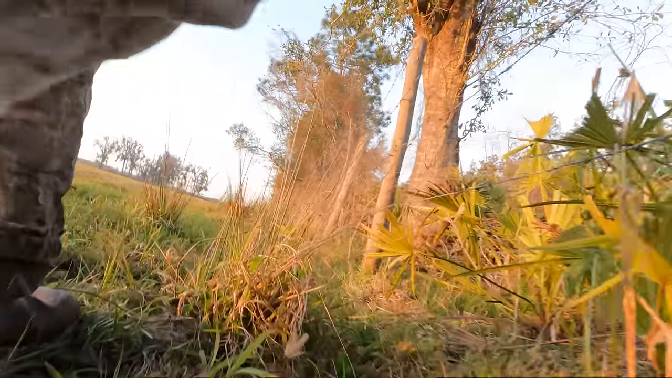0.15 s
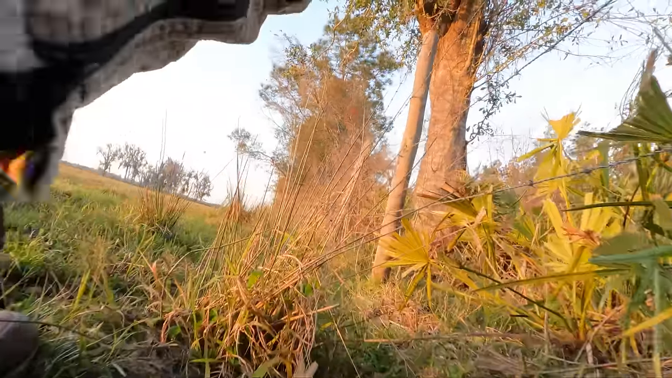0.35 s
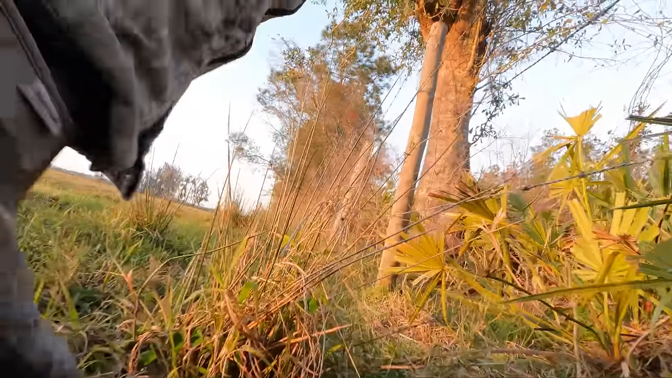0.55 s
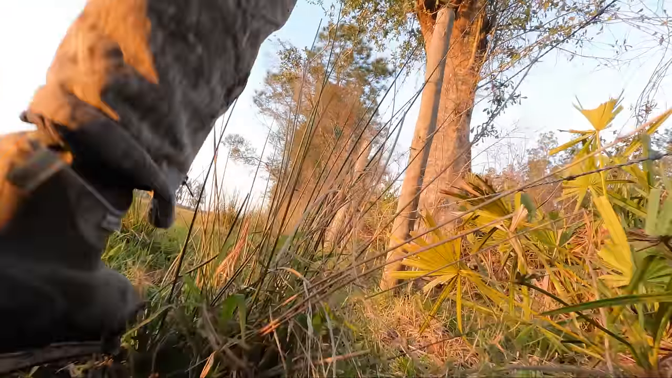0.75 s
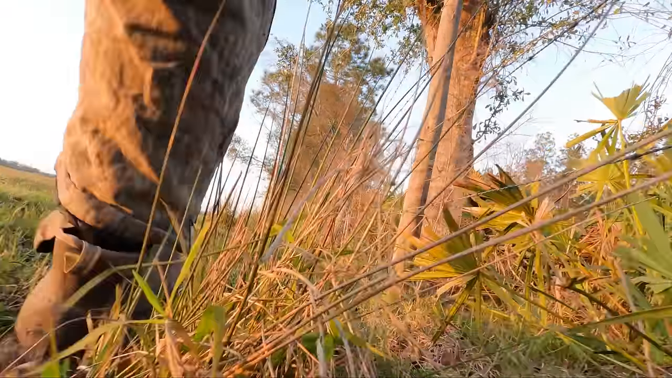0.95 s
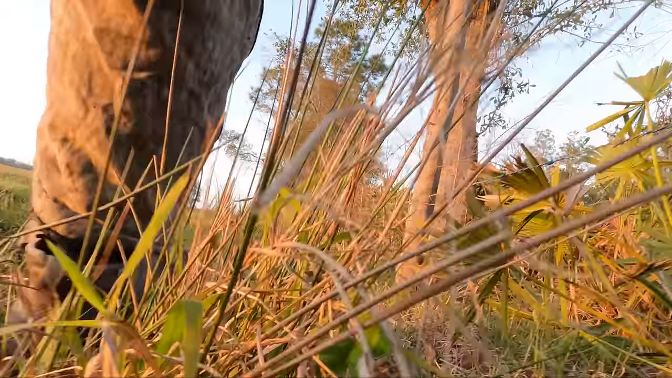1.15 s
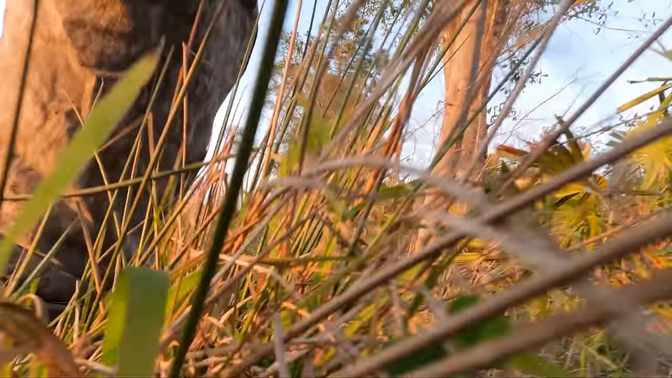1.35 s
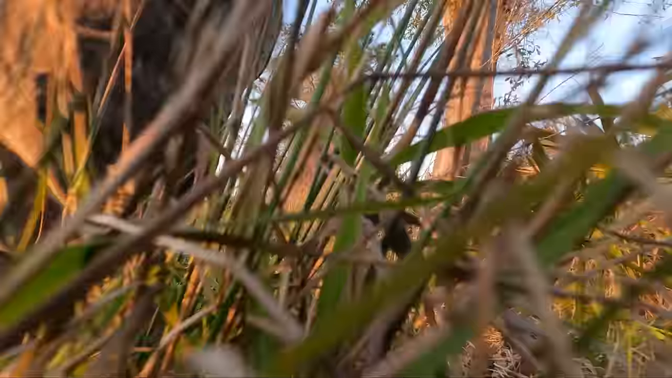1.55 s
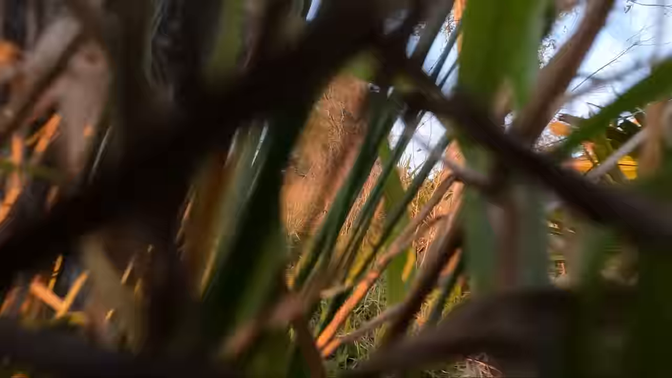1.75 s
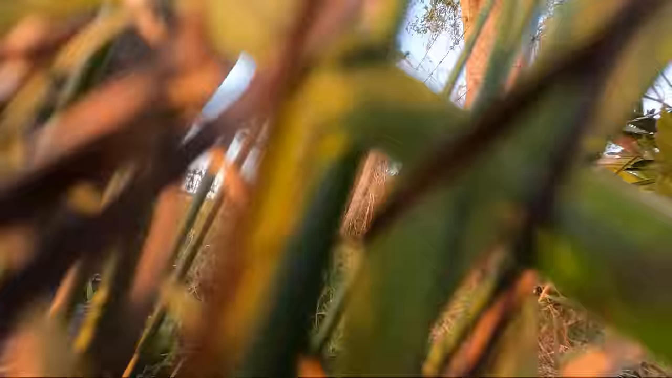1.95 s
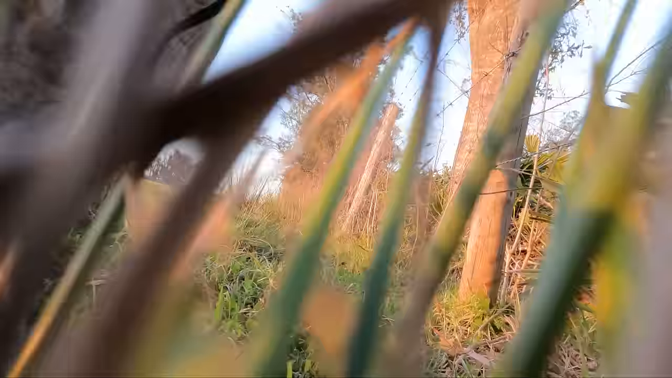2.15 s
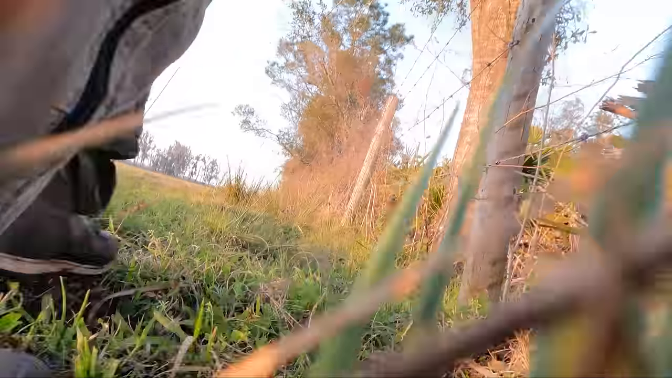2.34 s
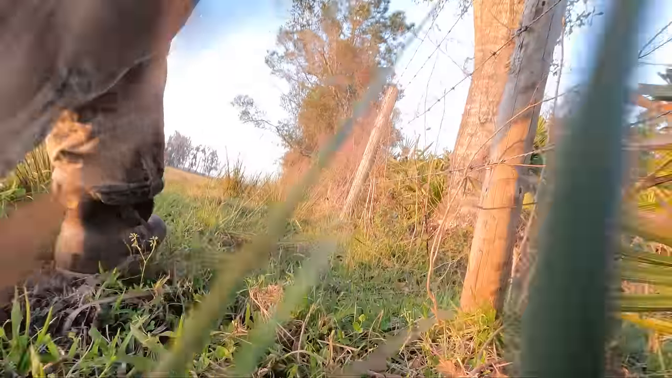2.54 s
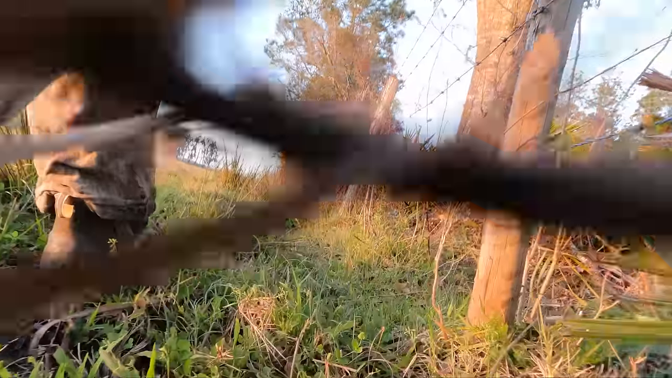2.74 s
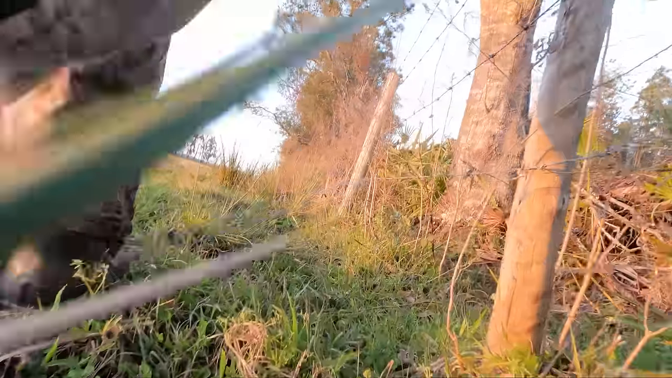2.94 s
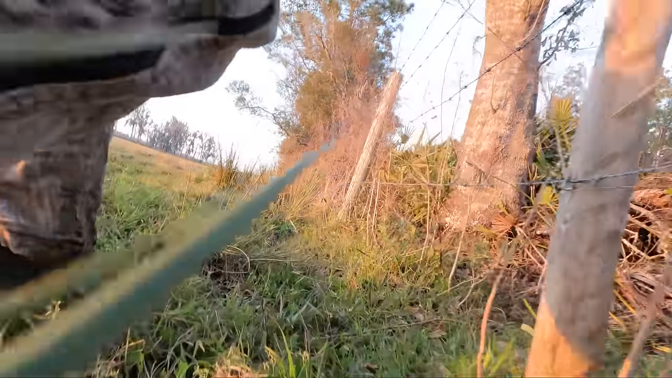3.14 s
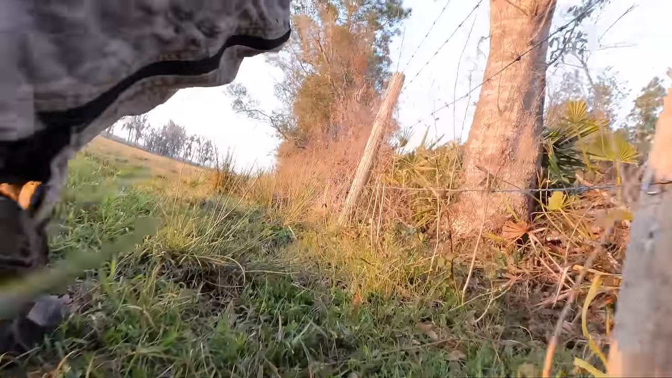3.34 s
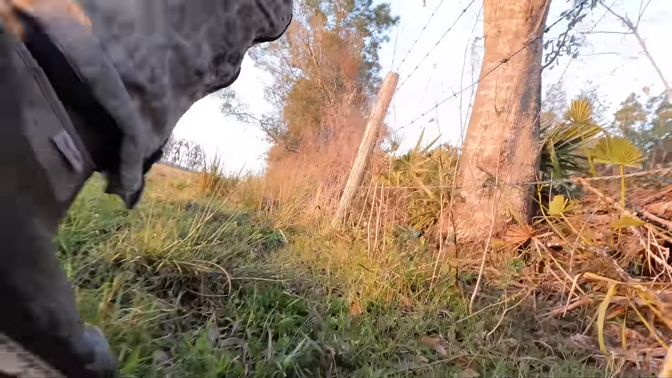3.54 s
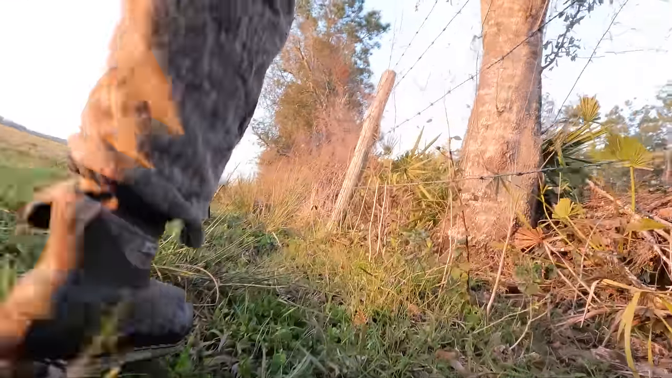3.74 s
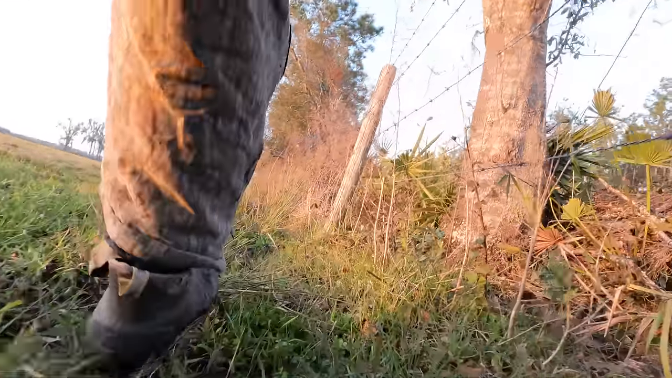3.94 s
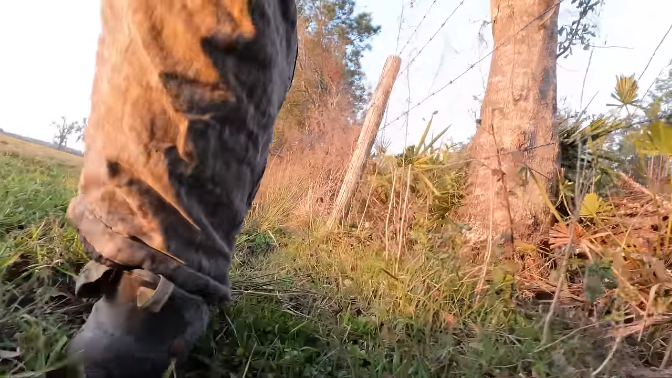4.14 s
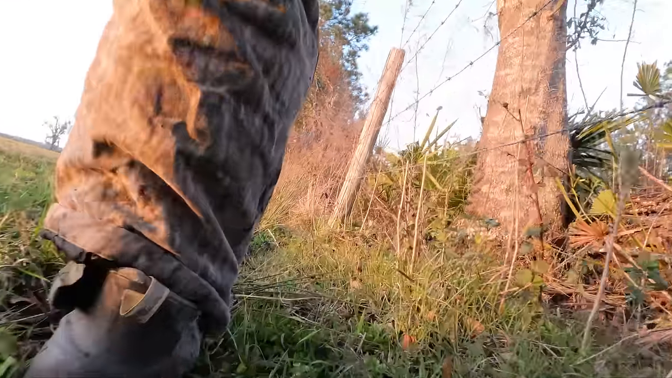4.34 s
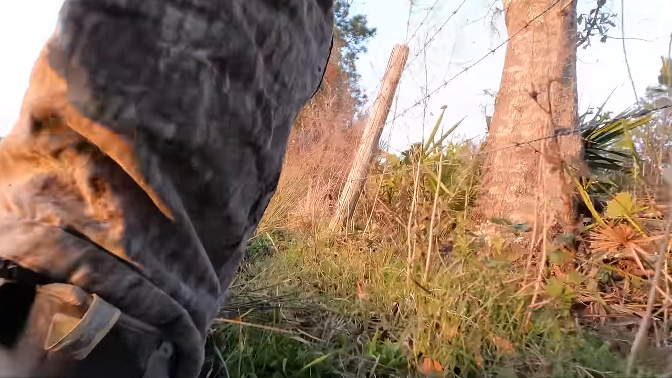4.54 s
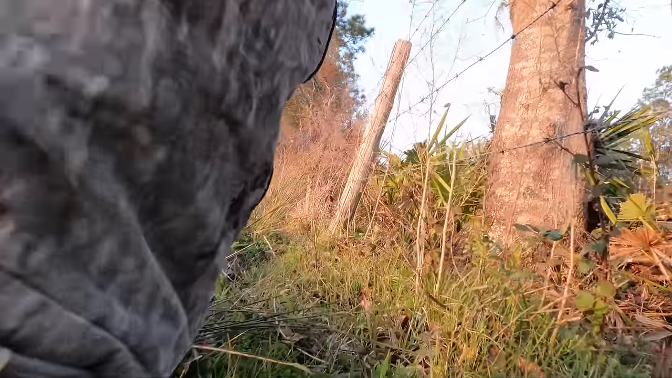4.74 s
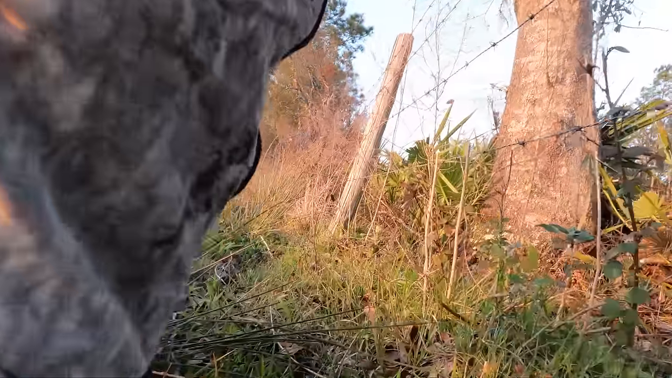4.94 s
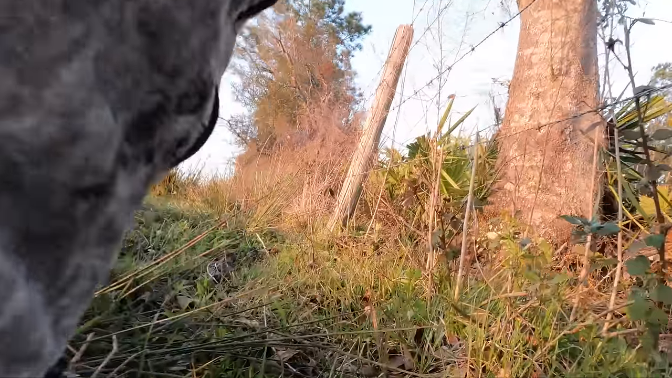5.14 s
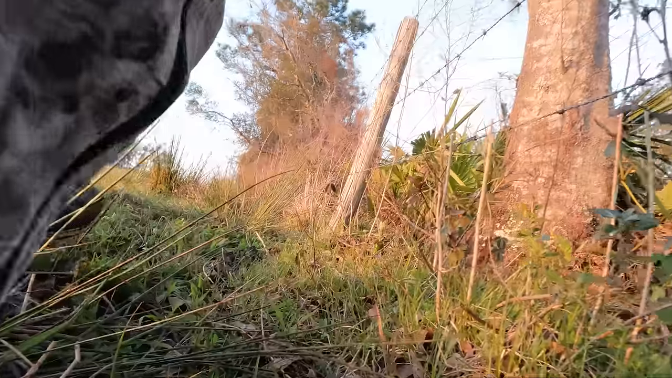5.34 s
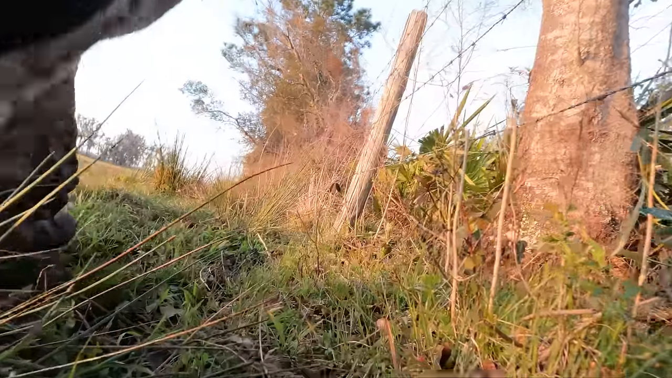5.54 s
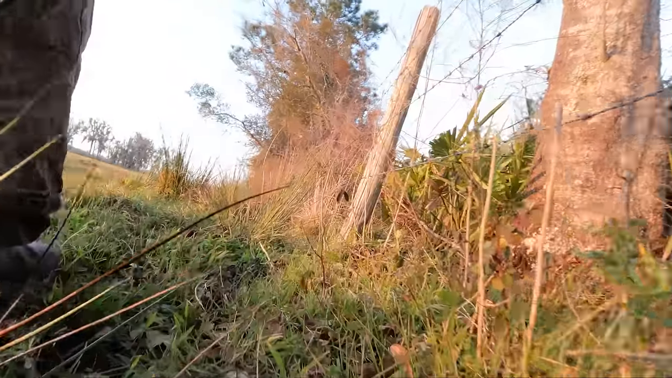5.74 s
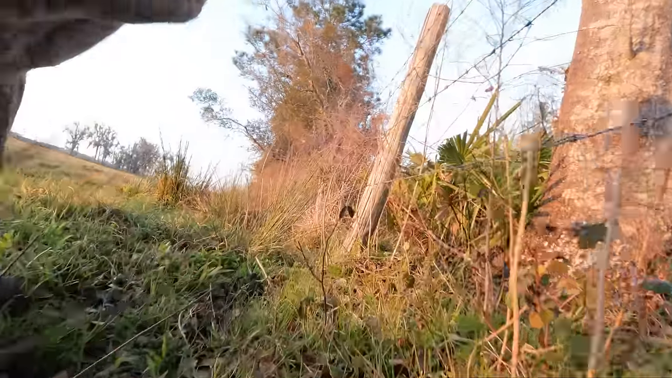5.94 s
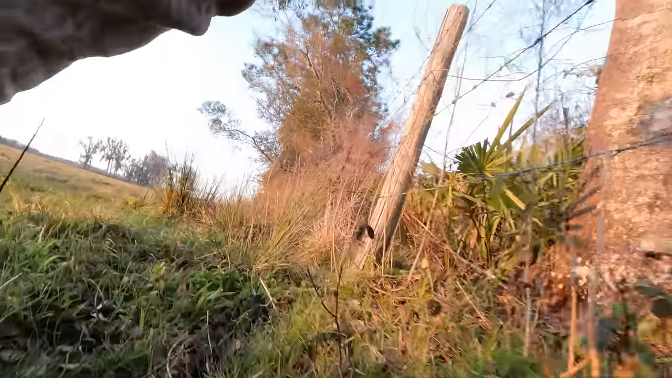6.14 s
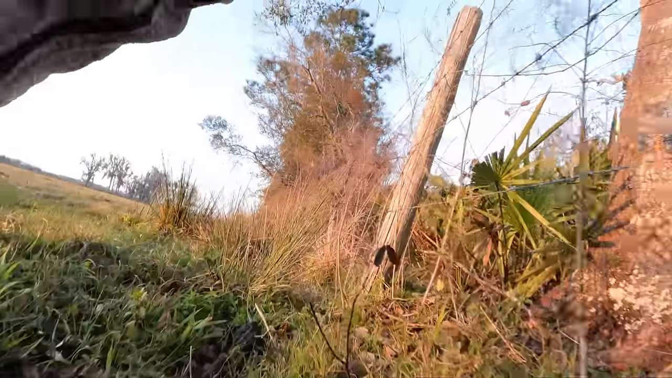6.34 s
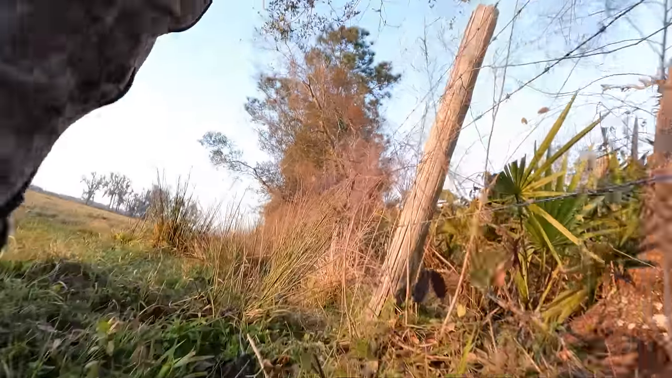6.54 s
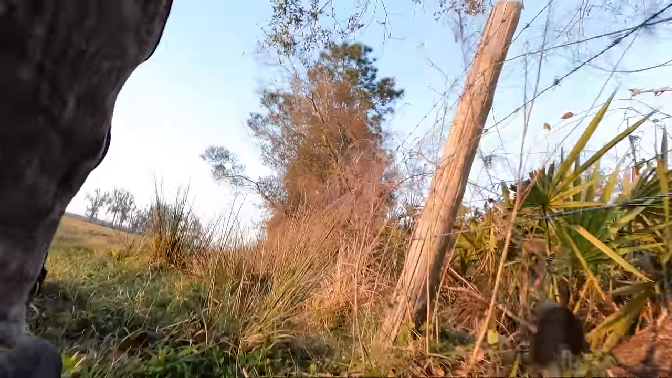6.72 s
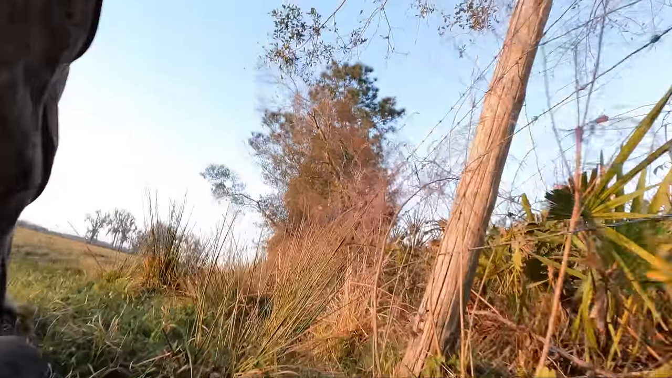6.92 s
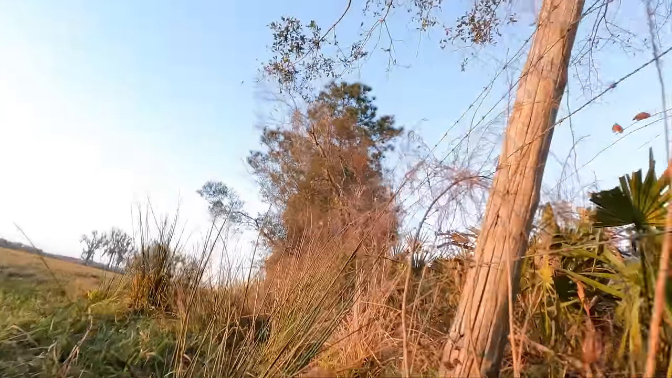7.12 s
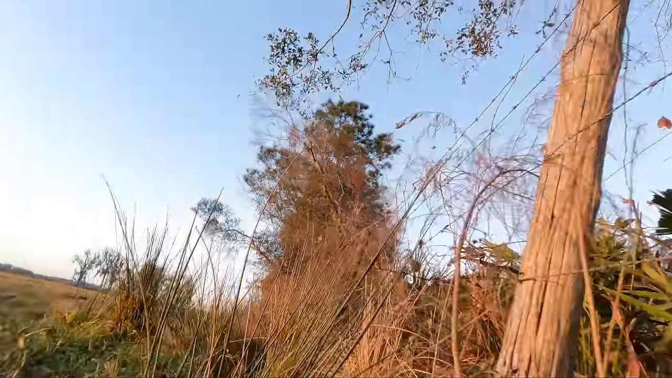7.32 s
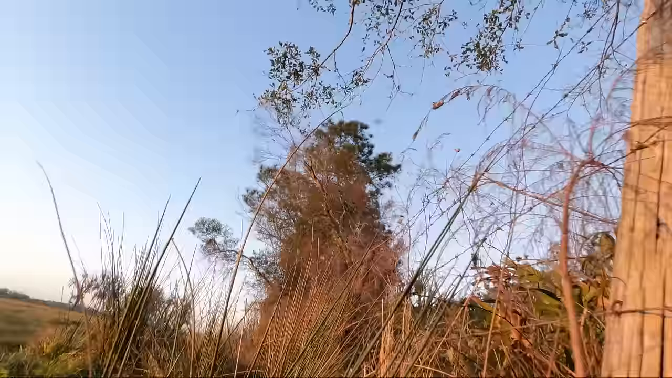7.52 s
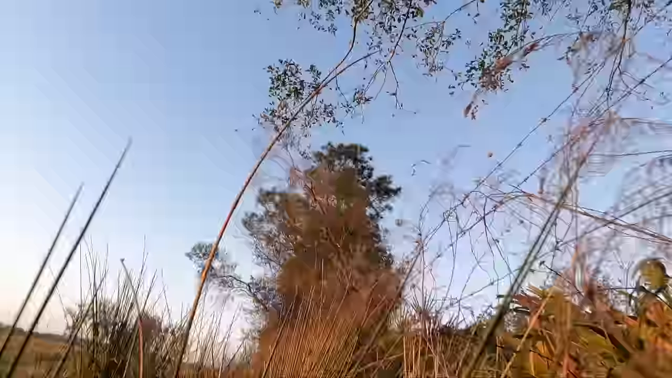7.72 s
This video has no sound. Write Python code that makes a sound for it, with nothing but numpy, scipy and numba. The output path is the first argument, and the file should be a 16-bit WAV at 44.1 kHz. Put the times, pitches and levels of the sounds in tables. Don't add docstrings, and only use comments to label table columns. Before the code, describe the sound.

Grass and dry stalks brush, scrape and knock right against a microphone as someone walks through pasture, loudest in a crackling burst early on.

```python
import sys
import numpy as np
from scipy import signal
from scipy.fft import rfft, irfft, dct
from scipy.io import wavfile
from scipy.ndimage import uniform_filter1d, map_coordinates
from numba import njit

SR = 44100
rng = np.random.default_rng(int(sys.argv[2]) if len(sys.argv) > 2 else 0)


def generate_wav(signal):
    frames = np.transpose(np.atleast_2d(signal))
    scaled = np.clip(frames, -1, 1) * 32767
    pcm = np.round(scaled).astype(np.int16)
    wavfile.write(sys.argv[1], SR, pcm)


def voltage_ratio(decibels):
    exponent = np.asarray(decibels, float) / 20
    return 10 ** exponent


N = 343053

BRUSH_DB = -33
ENGINE_HZ, ENGINE_DB, ENGINE_SECOND_DB = 37.55, -34.5, -20
SWEEP_RISE, JOLT_RISE = 0.94, 0.93
SWEEP_DB_PER_OCTAVE2 = -1.64
HEAVY_SHARE = 0.37
CRUNCH_T60_S, TICK_T60_S = 0.032, 0.012
FILTER_REACH = 0.59

SIZE_HZ = (130, 280, 1000, 3200, 6200)
# (frequency [Hz], level per Hz [dB])
PORT_COLOUR = [(65, -39), (110, -5.5), (150, -7.5), (450, -12), (1200, -12.5), (2600, -16), (3300, -17),
               (3950, -19), (4600, -23), (5400, -27.5), (6250, -29), (7000, -37), (7800, -50),
               (8700, -47.5)]
# (time [s], pressure [dB], tilt to fine parts [dB])
PRESSURE = [(0, -10.5, -1.5), (.45, -15, -5), (1.02, -13.5, 3.5), (1.3, -12, 5), (1.6, -9, -6.5),
            (1.78, 3, 2), (2.49, 2.5, 0), (3.03, 6, -2.5), (3.12, -9, 3), (3.55, -10.5, 1.5),
            (3.6, -13, -4), (4.4, -9.5, 0.5), (4.88, -15.5, -1.5), (5.59, -18, 0), (6.15, -8.5, -0.5),
            (6.7, -13, -4.5), (7.45, -11.5, -3.5), (7.65, -19, -5)]
# (time [s], peak [dB], time to fade 20 dB [s], pitch of the
# parts [Hz])
SWEEPS = [(.178, 0, 0.025, 1100), (.29, -4, -0.06, 3000), (.453, -5, 0.02, 500), (.84, -2.5, 0.25, 688),
          (1.1, -7.5, 1.1, 250), (1.128, 7.5, 0.0653, 3540), (1.46, 1, 0.2, 598), (1.67, 1.5, 0.2, 4020),
          (1.709, 12.5, -0.15, 1000), (1.762, 13.5, 0.0052, 1200), (2.086, 13.5, 0.17, 1500),
          (2.24, 10.5, 0.39, 2245), (2.92, 14.5, 0.16, 504), (3.01, 12, 0.14, 1510), (3.21, 5, 0.18, 1500),
          (3.429, 1.5, 0.26, 2510), (3.64, -5, 0.44, 302), (3.84, 1.5, 0.04, 900), (4.095, -9, -0.2, 700),
          (4.16, -3.5, 0.4, 298), (4.291, 3, 0.09, 605), (4.745, -4, 0.21, 2500), (5.22, -5.5, 0.5, 504),
          (5.94, -7.5, 0.9, 795), (6.317, 5, 0.1462, 1510), (6.74, -3.5, 0.1, 600),
          (6.979, -6.5, 0.27, 696), (7.065, 2, 0.09, 1206), (7.238, 3, 0.11, 1530),
          (7.48, -12.5, 0.22, 2980),
          (1.52, -1.5, 0.14, 1480), (2.6, 4.5, 0, 800), (2.789, 8, 0.12, 2480), (3.33, 4, 0.04, 1985),
          (3.76, -2, -0.1, 1505), (4.56, -4.5, 0.35, 714), (4.685, -1, 0.07, 2780), (1.455, 4, 0, 3500),
          (1.852, 12.5, 0.02, 2000), (4.08, -6.5, 0.3, 2800), (4.791, -6, 0.18, 2210),
          (2.06, 10.5, .03, 2000), (6.43, -2.5, 0.03, 3000), (6.5, -3, 0, 500), (7.52, -10.5, .1, 2500),
          (6.11, -12.5, 0.05, 3000), (6.34, 2.5, 0.18, 502), (6.96, -1.5, 0.03, 6000),
          (7.03, -7, 0.07, 6000), (7.31, -6.5, 0.13, 5000), (6.28, 0, 0, 3800), (6.94, 1, 0, 4530),
          (7.072, 2.5, 0.12, 5000)]
# (start [s], end [s], depth [dB], time to return [s])
LULLS = [
    (.1, .165, -4, .006),
    (0.458, 0.855, -15.5, 0.12),
    (1.172, 1.4, -4.5, 0.048),
    (0.889, 1.03, -3, .04),
    (3.895, 4.029, -4.5, .05),
    (4.6, 4.658, -4, .006),
    (6.805, 6.918, -15.5, .006),
]
# (frequency [Hz], width [Hz], level [dB])
FAR_RUSTLE = [
    (1660, 120, -57.5),
    (3900., 260, -75),
    (6190, 800, -82.5),
]
# (time [s], air on the port [dB], unsteadiness of the grip [dB])
CARRY = [(0, -39.5, -41.5), (.21, -37.5, -52.5), (.87, -37, -56), (.95, -42, -48), (1.1, -37.5, -51),
         (1.58, -32.5, -43.5), (1.7, -29.5, -40), (1.86, -18.5, -38.5), (2.47, -19.5, -31),
         (3.05, -19, -24), (3.38, -23.5, -46), (3.6, -28.5, -42), (4.18, -35, -49), (5.46, -42, -55),
         (6.2, -35, -54.5), (6.6, -39.5, -59), (7.02, -32, -51), (7.78, -35, -54.5)]
# (time [s], thump [dB], ring of the mount [dB], time to fade 20 dB [s])
JOLTS = [(0, -46.5, -28, 0), (.73, -42.5, -43, 0), (.87, -43.5, -47.5, 0.4), (1.1, -26.5, -31, -0.1),
         (1.648, -25, -25, 0.03), (1.86, -19, -14, 0.1454), (1.941, -18.5, -28, 0.18),
         (2.06, -17.5, -33, 0.15), (2.121, -24.5, -13, 0.156), (2.3, -31, -42.5, -0.4),
         (2.47, -21, -23, 0.29), (2.66, -31, -15.5, 0.07), (2.84, -34.5, -22.5, -0.05),
         (3.03, -20, -25.5, 0.26), (3.2, -22, -28.5, -0.03), (3.278, -47, -20.5, 0.17),
         (3.66, -36, -18.5, 0.05), (3.9, -47.5, -44, 1.2), (4.18, -22.5, -50, -0.1), (4.27, -44.5, -33, 0),
         (4.68, -46.5, -43.5, .5), (6.3, -38, -35, -0.03), (6.58, -44, -57.5, 2.5), (6.74, -27, -42, -0.13),
         (7.02, -27.5, -43, 0.1), (7.43, -43.5, -60, -0.4), (7.78, -40.5, -47, -1.2)]
# (time [s], pitch [Hz])
MOUNT_HZ = [(0, 88.4), (1.1, 94.6), (1.7, 88.6), (2.2, 86.78), (2.5, 80.44), (2.8, 85.58), (3.3, 84),
            (3.62, 79.2), (3.7, 90), (4.5, 84.2), (6.5, 100.5), (7.78, 98.6)]
# (time [s], depth [dB], half length [s])
DRONE_DIPS = [
    (0, -15, 0.15),
    (0.54, -7.5, 0.47),
    (0.724, -16, 0.12),
    (2.3, -16, 1.38),
    (3.69, -17.5, 0.084),
    (4.3, -4, 0.17),
    (5.6, -2.5, 0.62),
    (6.034, -12, 0.12),
    (6.895, -11, 0.074),
    (7.78, -2, 0.58),
]
# (time [s], peak [dB], ring [Hz])
TICKS = [(0.0493, -43, 2970), (0.2872, -33, 3730), (0.3844, -41, 2910), (0.5821, -41, 4300),
         (1.4547, -32, 2960), (1.485, -26, 3360), (1.5194, -21.5, 3510), (1.6044, -35.5, 2550),
         (1.639, -15.5, 3700), (1.7053, -21.5, 3410), (1.749, -28, 2700), (1.8036, -23.5, 3230),
         (1.8514, -13, 2920), (1.9144, -25, 3420), (2.0414, -15, 3020), (2.0867, -14.5, 2630),
         (2.3094, -20, 3400), (2.3894, -22, 3400), (2.598, -28, 2870), (2.6544, -23, 3600),
         (2.9944, -17.5, 3420), (3.0944, -20, 3510), (3.145, -22.5, 3750), (3.2094, -32, 2500),
         (3.418, -26, 3090), (3.4394, -32.5, 2630), (3.5374, -31, 3430), (4.082, -33, 2990),
         (4.6598, -31, 2640), (4.6894, -37.5, 2900), (4.7358, -28.5, 2630), (4.7744, -36, 2670),
         (5.6385, -20, 2580), (5.9384, -34, 2720), (5.9524, -24, 2880), (6.0516, -42, 2720),
         (6.1838, -28, 5080), (6.2307, -28, 3580), (6.2756, -21, 3510), (6.3344, -32, 3600),
         (6.3694, -36, 2660), (6.4268, -34, 2820), (6.557, -36, 2570), (6.96, -23, 4560),
         (6.977, -36, 4070), (7.022, -33, 3000), (7.0788, -31, 2500), (7.1244, -29.5, 2700),
         (7.2757, -31, 2770), (7.2944, -37, 2590), (7.3994, -43, 2510), (7.422, -31, 3650),
         (7.5794, -39, 3150)]
# (time [s], peak [dB], ring [Hz], time to fade 60 dB [s])
SCRAPES = [
    (0.1634, -27, 1620, 0.087),
    (0.4434, -31, 1400, 0.047),
    (1.7629, -23, 1453, 0.069),
    (2.9986, -20, 1204, 0.06),
    (6.9494, -31, 1965, 0.066),
    (7.0623, -27, 1716, 0.052),
]
# (time [s], peak [dB], ring [Hz], time to fade 60 dB [s])
KNOCKS = [(.164, -22.5, 1024, 0.07), (.443, -25, 1430, 0.057), (1.709, -14.5, 903, 0.05),
          (1.76, -12.5, 798, 0.038), (1.847, -18.5, 946, 0.048), (2.597, -16.5, 527, 0.039),
          (3.0, -11, 680, 0.038), (3.162, -10.5, 1082, 0.034), (3.414, -25, 1623, 0.057),
          (4.199, -25.5, 630, 0.054), (4.734, -26.5, 1793, 0.053), (5.936, -28.5, 523, 0.054),
          (7.122, -23.5, 797, 0.025), (7.514, -26, 635, 0.047)]
# (multiple of its pitch, level [dB])
STALK_PARTIALS = [
    (1.002, 5.5),
    (1.599, -7.5),
]
# (time [s], peak [dB], ring [Hz], time to fade 60 dB [s])
FLICKS = [(0.2882, -40, 6000, 0.007), (1.1268, -26, 6300, 0.014), (1.6212, -35.5, 5910, 0.013),
          (1.7619, -21, 6500, 0.011), (1.8033, -36.5, 5720, 0.012), (3.694, -25.5, 1310, 0.022),
          (3.62, -24, 1300, 0.023), (2.599, -20, 2500, .01), (4.299, -18, 746, 0.019),
          (5.06, -23.5, 1260, 0.023), (6.426, -25, 650, 0.015), (7.261, -20.5, 3770, 0.011),
          (7.276, -22.5, 2400, 0.011)]
# (time [s], peak [dB], ring [Hz], time to fade 60 dB [s])
TAPS = [(.443, -27, 600, .035), (.745, -30, 300, .02), (1.439, -25, 790, .025), (1.7625, -10, 1200, .008),
        (1.8845, -17, 2000, .005), (2.599, -18, 696, 0.0091), (3.001, -13, 900, 0.013),
        (3.4395, -14, 1250, 0.0085), (4.2015, -24, 600, .01), (4.3012, -17.5, 222, 0.022),
        (5.64, -31, 1500, 0.014), (5.841, -33, 794, .012), (6.021, -16, 800, .008),
        (6.275, -29, 1300, .012), (6.325, -25, 420, .04), (6.974, -21, 330, .03), (7.062, -24, 520, .015),
        (7.194, -25, 560, 0.022), (7.228, -23, 377, .02), (7.4645, -27.5, 696, 0.0089)]
# (time [s], peak [dB], ring [Hz], time to fade 60 dB [s])
STEPS = [(0.743, -33.5, 101, 0.062), (1.096, -20, 125, 0.06), (1.5, -34, 153, 0.096),
         (1.853, -17, 101.4, 0.13), (3.049, -29, 172.3, 0.074), (3.629, -27.5, 106, 0.067),
         (4.295, -32, 182, 0.087), (5.059, -40, 145, 0.08), (6.204, -41, 134, 0.08),
         (6.703, -34, 121.6, 0.08), (7.691, -39, 121, 0.12)]
# (time [s], peak [dB], ring [Hz])
CRUNCHES = [(1.38, -24, 708), (1.419, -31, 670), (1.482, -23.5, 687), (1.517, -26, 810), (1.595, -26, 656),
            (1.746, -17.5, 1270), (1.849, -14, 964), (2.056, -16.5, 890), (2.089, -20, 630),
            (2.102, -11.5, 1280), (2.384, -12.5, 1460), (2.579, -18, 1340), (2.713, -12.5, 634),
            (2.826, -22, 850), (2.907, -8, 868), (3.0, -12.5, 654), (3.093, -21, 1160),
            (3.145, -13.5, 1080), (3.207, -23, 985), (3.239, -23, 770), (3.418, -18, 1660),
            (3.525, -21.5, 1655), (3.84, -28, 1410), (4.052, -31, 724), (4.091, -27, 690),
            (4.332, -23.5, 765), (4.66, -29, 2120), (4.69, -25, 1540), (4.736, -22, 1766),
            (4.768, -33, 1364), (4.799, -28, 1840), (5.611, -34, 1630), (5.699, -32, 1470),
            (5.796, -25.5, 697), (5.937, -32, 1400), (6.048, -37, 600), (6.085, -22, 820),
            (6.161, -27, 1580), (6.275, -23, 1200), (6.301, -29, 1500), (6.329, -27, 651),
            (6.426, -31, 721), (6.626, -37, 1030), (6.679, -30, 791), (6.702, -27, 770), (6.932, -21, 840),
            (7.01, -34, 630), (7.078, -25, 1750), (7.142, -22, 1005), (7.517, -35, 724), (7.578, -27, 990)]
# (time [s], peak [dB], ring [Hz], time to fade 60 dB [s])
SNAPS = [(1.6608, -9.5, 3800, 0.016), (1.7047, -17.5, 3410, 0.019), (1.7484, -26, 2660, 0.007),
         (1.78, -24, 2550, 0.007), (1.8487, -21, 3270, 0.013), (1.8843, -17, 3300, 0.013),
         (2.0458, -20, 3160, 0.012), (2.0579, -21, 3560, 0.012), (2.6327, -17.5, 3250, 0.017),
         (2.9469, -22, 2610, 0.02), (2.985, -29, 2630, 0.013), (3.0008, -16, 2470, 0.011),
         (3.0182, -10, 3800, 0.013), (3.1453, -24.5, 3900, 0.015), (3.4064, -30, 3080, 0.016),
         (4.2014, -28, 2800, 0.023), (4.2815, -24, 2960, 0.028), (5.0603, -31, 3625, 0.019),
         (5.84, -30, 2430, 0.017), (7.1718, -33, 3880, 0.016), (7.1865, -20, 3940, 0.018),
         (7.2152, -19.5, 4010, 0.021), (7.249, -20.5, 3000, 0.014), (7.4644, -23.5, 3340, 0.0096)]
# (multiple of its pitch, level [dB])
STEM_PARTIALS = [
    (.45, 0.5),
    (0.999, 4),
    (1.6, -19),
]
# (time [s], peak [dB], ring [Hz], time to fade 60 dB [s])
THUDS = [(2.057, -7, 245, 0.031), (2.826, -13, 434, 0.039), (2.935, -9.5, 421, 0.059),
         (4.089, -16, 245, 0.025), (4.149, -25, 350, 0.063), (4.284, -25, 257, 0.035),
         (4.675, -29, 438, 0.045), (5.064, -31, 270, 0.03), (5.286, -33, 335, 0.065),
         (5.842, -29, 480, 0.051), (5.912, -26.5, 336, 0.04), (6.563, -31, 376, 0.06),
         (6.69, -30, 460, 0.048), (6.927, -30.5, 423, 0.029), (7.011, -26, 258, 0.033),
         (7.218, -20, 297, 0.02), (7.453, -31.5, 323, 0.078)]
# (time [s], peak [dB], ring [Hz], time to fade 60 dB [s])
CREAKS = [
    (3.572, -23.5, 678, 0.04),
    (3.62, -21.5, 690, 0.036),
    (3.634, -22, 750, 0.036),
    (3.685, -30, 740, 0.044),
]
# (time [s], very top [dB])
WIND_FILTER = [
    (1.0, 0),
    (1.6, 4.5),
    (2.06, 4),
    (2.15, -10),
    (2.3, -11.5),
    (3.6, -15),
    (4.6, -9.5),
    (4.9, -5.5),
    (5.05, 2.5),
]
# (time [s], level at its resonances [dB])
CAVITY_DB = [(0, 1), (1.5, 1), (2.2, 0), (4.6, 0), (5.7, 2), (7.78, 3)]
# (frequency [Hz], half width [Hz])
CAVITY = [
    (3850., 230),
    (6200., 350),
]
# (time [s], edge [Hz])
EDGE_HZ = [(0, 8700), (.31, 8700), (.34, 7200), (.44, 7200), (.49, 8150), (.6, 7300), (.75, 7150),
           (.8, 8700), (2.2, 8700), (2.3, 8250), (3.05, 8250), (3.15, 7850), (3.54, 7850), (3.6, 7350),
           (3.8, 7550), (4.48, 7500), (4.68, 8700), (7.78, 8700)]


def level(x, db):
    return x * voltage_ratio(db) / np.sqrt(np.mean(x ** 2))


def curves(table):
    s, *columns = np.transpose(table)
    return np.array([np.interp(np.arange(N) / SR, s, c) for c in columns])


def walk(rate):
    k = int(SR / rate)
    steps = np.repeat(rng.standard_normal(N // k + 1), k)
    return 1.212 * uniform_filter1d(uniform_filter1d(steps, k), k)[:N]


def filtered(x, hz, kind, order):
    return signal.sosfilt(signal.butter(order, hz, kind, fs=SR, output="sos"), x)


def noise_band(low_hz, high_hz, order):
    return filtered(rng.standard_normal(N), [low_hz, high_hz], "bandpass", order)


def rubbing(spread_hz):
    return level(filtered(rng.standard_normal(N), spread_hz, "low", order=2), 0)


@njit
def grains(start, hz, t60, rise, size, clean, rub):
    out = np.zeros(N)
    for k in range(len(start)):
        fade = np.exp(-np.log(1000) / (t60[k] * SR))
        turn, z = fade * np.exp(2j * np.pi * hz[k] / SR), 1 + 0j
        swell, gap = np.exp(-1 / (rise[k] * SR)), 1.
        for i in range(start[k], min(start[k] + int(t60[k] * SR), N)):
            gap *= swell
            out[i] += size[k] * (1 - gap) * z.imag * (clean[k] + (1 - clean[k]) * rub[i])
            z *= turn
    return out


def hits(table, spread_hz, rise_share, gain_db, clean, multiple=1):
    s, db, hz, t60 = np.transpose(table)
    t60 = np.maximum(t60, .002)
    start = (s * SR).astype(np.int64)
    clean = np.full(len(s), clean)
    return grains(start, multiple * hz, t60, rise_share * t60, voltage_ratio(db + gain_db), clean, rubbing(spread_hz))


def small(table, t60):
    return [(*row, t60) for row in table]


def swells(s, db, fade_s, rise):
    t = np.arange(0, N + 64, 64) / SR
    late = (t - s[:, None]) / np.maximum(fade_s, .01)[:, None]
    return voltage_ratio(db[:, None] - 20 * np.maximum(late, -late / rise)) ** 2


def on_top(floor_db, power):
    return 10 * np.log10(voltage_ratio(floor_db) ** 2 + np.interp(np.arange(N), np.arange(len(power)) * 64, power))


def contact():
    t = np.arange(N) / SR
    press_db, fine_db = curves(PRESSURE)
    for start, end, db, back_s in LULLS:
        corners = [start, (start + end - back_s) / 2, end - back_s, end]
        press_db = press_db + np.interp(t, corners, [0, db, db, 0])
    s, db, fade_s, hz = np.transpose(SWEEPS)
    power = swells(s, db, fade_s, SWEEP_RISE)
    levels = []
    for size_hz in SIZE_HZ:
        floor_db = press_db + 0.62 * np.log2(size_hz / 1600.0) * fine_db
        share = voltage_ratio(SWEEP_DB_PER_OCTAVE2 * np.log2(hz / size_hz) ** 2) ** 2
        levels.append(on_top(floor_db, share @ power))
    return np.array(levels)


def slips(effort, count, cycles, spread, scatter_db, clean):
    when, pitch, tail, ring, way = rng.random((count, 5)).T
    start = (when * (N - 1)).astype(np.int64)
    hz = 110 + 8700 * pitch ** 2
    t60 = cycles * np.exp(spread * (ring - .5)) / hz
    place = np.interp(np.log(hz), np.log(SIZE_HZ), np.arange(len(SIZE_HZ)))
    db = map_coordinates(effort, [place, start], order=1) - scatter_db * np.log(tail + .02)
    size = np.sign(way - .5) * voltage_ratio(db) * hz ** .25 / np.sqrt(t60)
    return level(grains(start, hz, t60, t60 / 20, size, np.full(count, clean), rubbing(320.0)), 0)


def brushing(effort, bunch_db=1.0, patch_db=2.0, clump_db=0.74, leaf_db=-6.5, crackle_db=-11.5):
    effort = effort - 10 * np.log10(np.mean(voltage_ratio(effort) ** 2, axis=1, keepdims=True))
    patches = np.array([patch_db * walk(25) for _ in SIZE_HZ])
    bunched = effort + patches + bunch_db * walk(70) + clump_db * walk(16)
    bed = slips(bunched, count=110000, cycles=4.7, spread=1.98, scatter_db=1.0, clean=1.)
    leaves = slips(effort, count=5000, cycles=24.3, spread=2.0, scatter_db=2.5, clean=0.67)
    crackle = slips(effort, count=2500, cycles=5.7, spread=1.5, scatter_db=3.0, clean=0.7)
    f = np.maximum(np.fft.rfftfreq(N, 1 / SR), 1)
    port_hz, port_db = np.transpose(PORT_COLOUR)
    colour_db = np.interp(np.log(f), np.log(port_hz), port_db)
    mix = bed + voltage_ratio(leaf_db) * leaves + voltage_ratio(crackle_db) * crackle
    return level(irfft(rfft(mix) * voltage_ratio(colour_db), N), BRUSH_DB)


def field(blades_db):
    bands = [level(noise_band(hz - w / 2, hz + w / 2, order=1), db) for hz, w, db in FAR_RUSTLE]
    hush_db = 0.79 * np.minimum(blades_db + 12.0, 0)
    return sum(bands) * voltage_ratio(1.8 * walk(1.6) + hush_db)


def handling(thump_db=2.5, ring_db=-1.5):
    air_db, grip_db = curves(CARRY)
    s, hit_db, shake_db, fade_s = np.transpose(JOLTS)
    thumps = on_top(grip_db + thump_db, swells(s, hit_db, fade_s, JOLT_RISE).sum(0))
    rings = on_top(grip_db + ring_db, swells(s, shake_db, fade_s, JOLT_RISE).sum(0))
    return air_db, thumps, rings


def buffeting(air_db, thump_db):
    swings = noise_band(4., 28., order=2)
    thumps = noise_band(42., 70., order=2)
    return level(swings, 0) * voltage_ratio(air_db) + level(thumps, 0) * voltage_ratio(thump_db)


def mount(shake_db, wander_hz=8., flutter_db=3.):
    phase = 2 * np.pi * np.cumsum(curves(MOUNT_HZ)[0] + wander_hz * walk(25)) / SR
    return np.sqrt(2) * np.sin(phase) * voltage_ratio(shake_db + flutter_db * walk(30))


def drone_level():
    t = np.arange(N) / SR
    return ENGINE_DB + sum(db * np.clip(1 - np.abs(t - s) / half, 0, 1) for s, db, half in DRONE_DIPS)


def engine(drone_db, wander=0.0209):
    phase = 2 * np.pi * np.cumsum(ENGINE_HZ * (1 + wander * walk(2.7))) / SR
    return np.sqrt(2) * voltage_ratio(drone_db) * (np.sin(phase) + voltage_ratio(ENGINE_SECOND_DB) * np.sin(2 * phase))


def ticks():
    return hits(small(TICKS, TICK_T60_S), 1100., 0.06, -1.5, clean=0.48)


def scrapes():
    return hits(SCRAPES, 450.0, 0.14, 9.2, clean=0.46)


def knocks():
    return sum(hits(KNOCKS, 450., 0.086, db, clean=0.44, multiple=k) for k, db in STALK_PARTIALS)


def flicks():
    return hits(FLICKS, 900., 0.037, 2.4, clean=0.56)


def taps():
    return hits(TAPS, 600., .04, 3.0, clean=0.81)


def footfalls():
    return hits(STEPS, 45.0, 0.055, 9.8, clean=0.77)


def crunches():
    return hits(small(CRUNCHES, CRUNCH_T60_S), 700., 0.1, 1.8, clean=0.32)


def snaps():
    return sum(hits(SNAPS, 1400.0, 0.045, db - 1.5, clean=0.3, multiple=k) for k, db in STEM_PARTIALS)


def thuds():
    return sum(hits(THUDS, 320.0, 0.046, db, clean=0.45, multiple=k) for k, db in STALK_PARTIALS)


def creaks():
    return hits(CREAKS, 150., 0.11, 3.6, clean=0.87)


def scene():
    air_db, thump_db, shake_db = handling()
    heaviest = np.array(SIZE_HZ) == min(SIZE_HZ)
    effort = contact() + np.outer(heaviest, HEAVY_SHARE * thump_db)
    rustle = brushing(effort) + field(effort[3])
    low = buffeting(air_db, thump_db) + mount(shake_db) + engine(drone_level()) + footfalls()
    contacts = filtered(scrapes() + knocks() + flicks() + snaps() + thuds() + creaks(), 6400.0, "low", order=6)
    bits = filtered(ticks() + crunches(), 5200., "low", order=3)
    return (rustle + contacts + taps() + bits + low)[None]


def part(x, share):
    return dct(dct(x, norm="ortho") * share, type=3, norm="ortho")


def wind_filter(x):
    f, filter_db = np.arange(N) * SR / (2 * N), curves(WIND_FILTER)[0]
    top = np.clip((f - 7200.) / 820.0, 0, 1)
    treble = np.clip((f - 4500.) / 2100.0, 0, 1) - top
    top_change = (voltage_ratio(filter_db) - 1) * part(x, top)
    return x + top_change + (voltage_ratio(FILTER_REACH * filter_db) - 1) * part(x, treble)


def cavity(x):
    f = np.arange(N) * SR / (2 * N)
    ring = sum(np.exp(-((f - hz) / half_hz) ** 2) for hz, half_hz in CAVITY)
    return x + (voltage_ratio(curves(CAVITY_DB)[0]) - 1) * part(x, ring)


def edged(x):
    f, t, frames = signal.stft(x, SR, nperseg=2048, boundary="odd")
    edge_hz = np.interp(t, *np.transpose(EDGE_HZ))
    return signal.istft(frames * (f[:, None] < edge_hz), SR, nperseg=2048)[1][..., :N]


def top_cut(x):
    return signal.sosfilt(signal.butter(12, 8620, fs=SR, output="sos"), x)


def record(dry):
    shaped = cavity(wind_filter(dry))
    steep_low = signal.ellip(12, .2, 90, 8650, fs=SR, output="sos")
    mix = signal.sosfilt(steep_low, edged(shaped))
    return top_cut(mix)


dry = scene()
out = record(dry)
generate_wav(out)
```